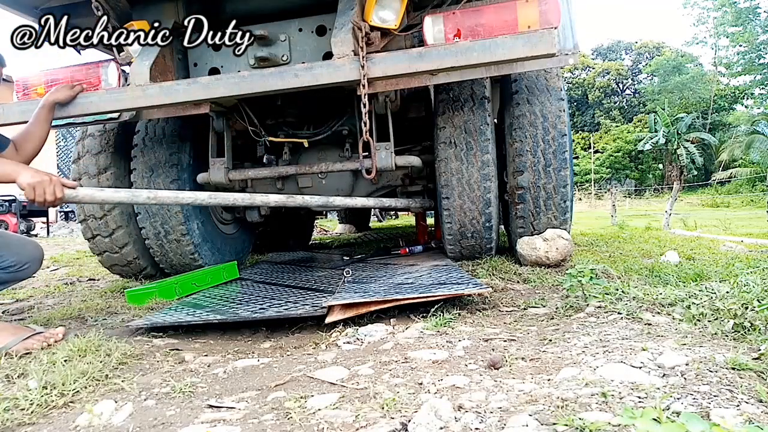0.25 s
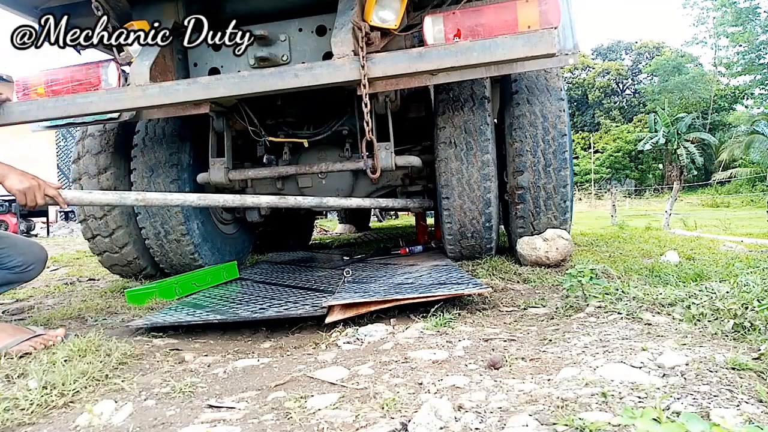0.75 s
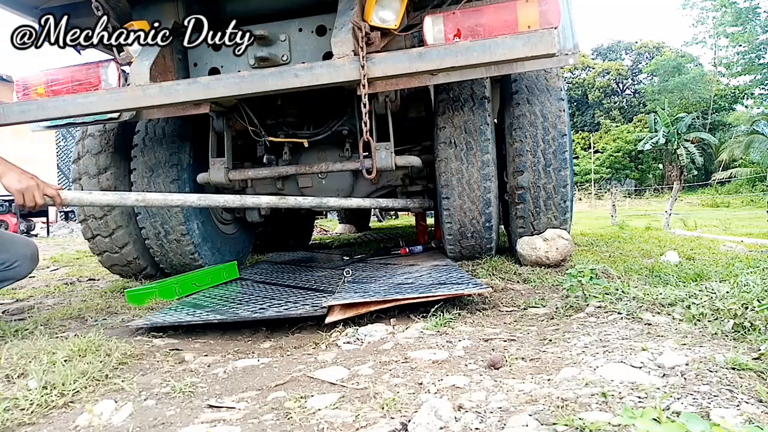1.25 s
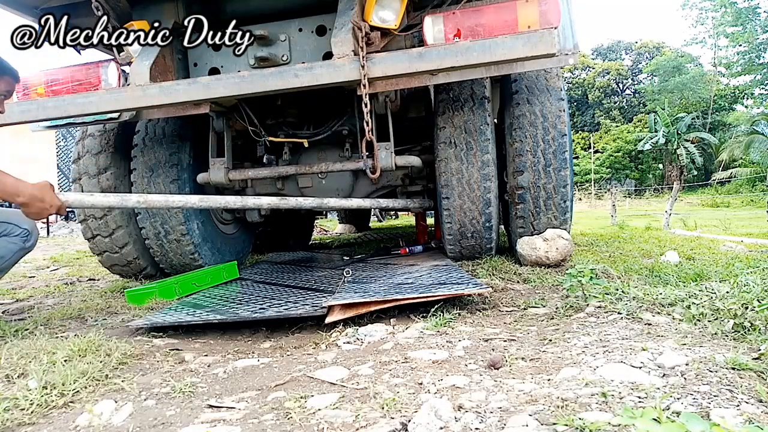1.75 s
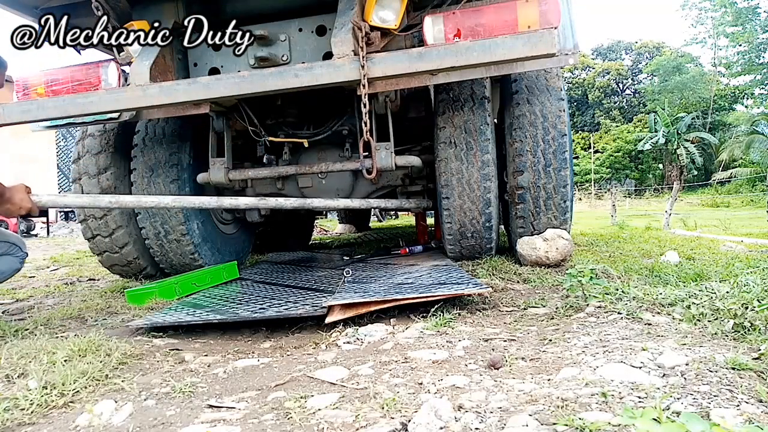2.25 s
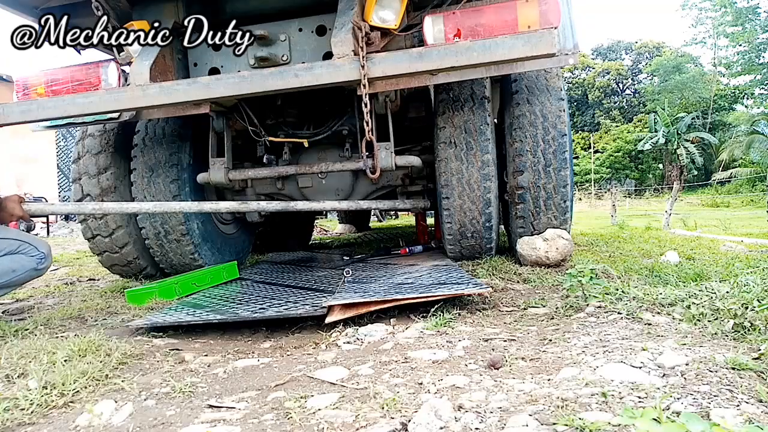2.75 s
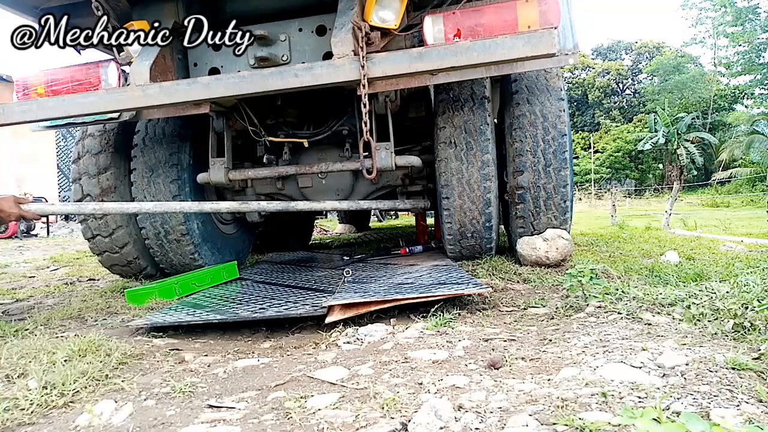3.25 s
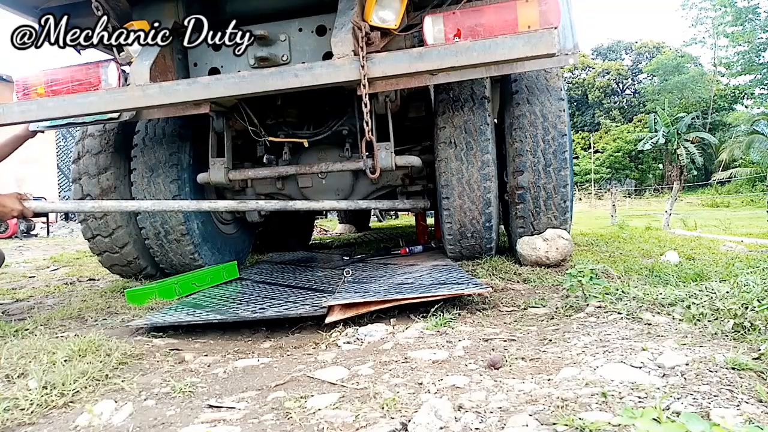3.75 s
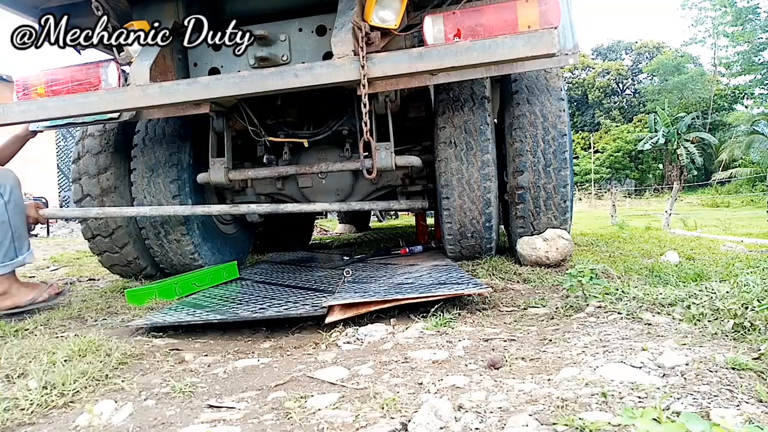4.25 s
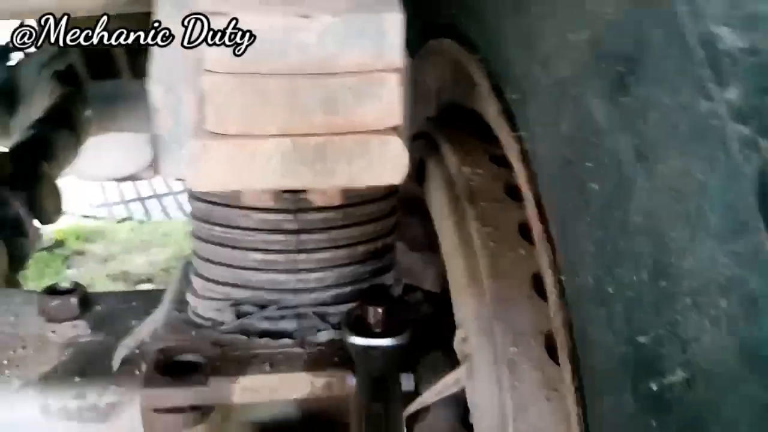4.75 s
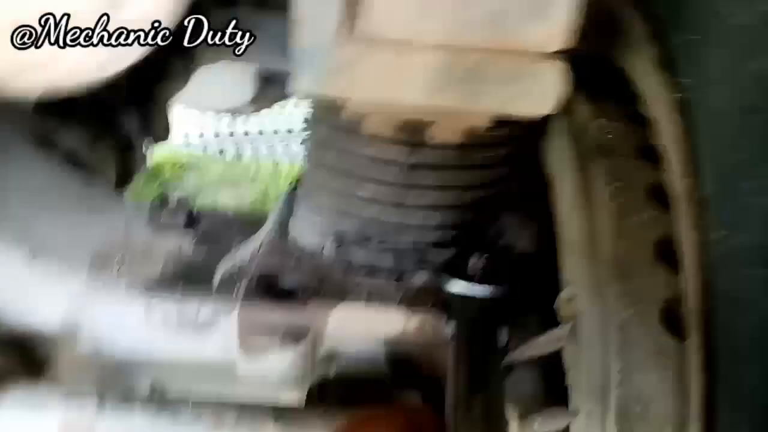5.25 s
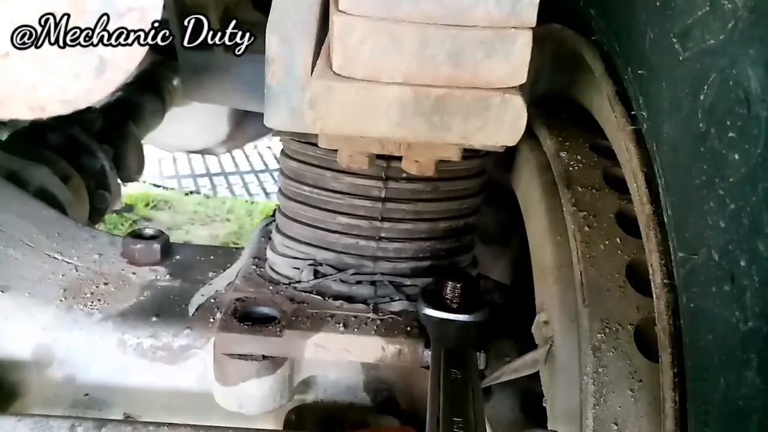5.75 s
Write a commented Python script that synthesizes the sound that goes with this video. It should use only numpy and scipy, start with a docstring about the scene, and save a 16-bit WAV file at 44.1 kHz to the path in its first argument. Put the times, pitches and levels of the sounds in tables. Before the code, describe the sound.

A dense insect chorus buzzes over a faint distant engine with a few small metal ticks, then low wind buffeting thumps the microphone.

```python
"""Beside a parked truck, then under it: a chorus of insects buzzes from dense clicks ringing resonances.
A cricket's raspy chirps and small metal ticks are shaped noise; an engine far away is a stack of wavering sines.
Behind them lie soft drones, a thin whine and a roar. Late on the scene cuts to under the truck, where noise
rumble and short sine puffs of wind buffet each microphone port on its own, with grainy scuffs. The left port is
muffled; what the ports share of chorus, engine, noisy drone bands, whine and roar reaches it first."""
import sys
import numpy as np
from scipy import signal
from scipy.fft import rfft, irfft, next_fast_len
from scipy.io import wavfile
from scipy.ndimage import uniform_filter1d, map_coordinates

SR = 44100
rng = np.random.default_rng(int(sys.argv[2]) if len(sys.argv) > 2 else 0)


def master(y):
    """Save y as 16-bit WAV."""
    cut = np.clip(np.atleast_2d(y).T, -1, 1)
    pcm = np.round(cut * 32767)  # scale
    wavfile.write(sys.argv[1], SR, pcm.astype(np.int16))


N = 264139

# Strength of the wind buffeting under the truck, before the left port's lift in scene().
# Each row: time in seconds, left level in dB, right level in dB.
BUFFETING = [(4.78, -42.5, -55), (4.95, -38, -45.5), (5.1, -40.5, -41), (5.26, -42.5, -35),
             (5.42, -37.5, -39), (5.57, -45, -37), (5.72, -35, -34.5), (5.88, -45.5, -34.5),
             (5.99, -43, -39)]
GUST_START_S = 4.775
PORT_LAG_S = 50 / SR  # how much later the right port hears most shared sounds


def amp(db):
    """Amplitude factor for a level in dB."""
    return 10 ** (np.asarray(db) / 20)


def unit(x):
    """Scale each channel to an RMS of one."""
    return x / np.sqrt(np.mean(x ** 2, axis=-1, keepdims=True) + 1e-20)


def along(points, hz):
    """Read a curve of (Hz, value) points on a log frequency axis."""
    point_hz, value = np.transpose(points)
    return np.interp(np.log(hz + 1), np.log(point_hz + 1), value)


def curves(rows):
    """One value per sample for each column after the time."""
    s, *columns = np.transpose(rows)
    return [np.interp(np.arange(N) / SR, s, column) for column in columns]


def wobble(rate):
    """A smooth random curve, rate knots a second."""
    knots = rng.standard_normal(int(N * rate / SR) + 4)
    return map_coordinates(knots, [np.arange(N) * rate / SR])


def filtered(x, response):
    """Shape the spectrum of x by a complex response of frequency."""
    m = next_fast_len(x.shape[-1] + 8192)
    spectrum = rfft(x, m) * response(np.fft.rfftfreq(m, 1 / SR))
    return irfft(spectrum, m)[..., :x.shape[-1]]


def resonance(hz, centre_hz, width_hz):
    """Response of one damped resonator; its powers are narrower bands."""
    return 1j * hz * width_hz / (centre_hz ** 2 - hz ** 2 + 1j * hz * width_hz)


def spread(three, alike, lag_s):
    """A shared signal, late at the right port, mixed with one of each port's own."""
    alike = np.clip(alike, 0, 1)
    late = filtered(three[0], lambda hz: np.exp(-2j * np.pi * hz * lag_s))
    shared = np.array([three[0], late])
    return np.sqrt(alike) * shared + np.sqrt(1 - alike) * three[1:]


def clicks(count, rate, jitter):
    """Three crowds of singers, each insect clicking at its own nearly steady rate."""
    rates = rate * amp(rng.normal(0, 1.5, (3, count, 1)))
    steps = (1 + jitter * rng.standard_normal((3, count, int(2 * rate * N / SR)))) / rates
    start_s = -rng.random((3, count, 1)) / rates
    at = ((np.cumsum(steps, axis=2) + start_s) * SR).astype(int).clip(0, N)
    size = rng.standard_normal(at.shape)
    # late clicks pile up at index N, which is cut off
    return np.array([np.bincount(a.ravel(), s.ravel(), N + 1)[:N] for a, s in zip(at, size)])


def chorus():
    """Dense clicks ring each resonance; under the truck direct sound is shaded and only scattered sound stays."""
    # Resonances of the singers. Each row: centre in Hz, width of one stage in Hz, base level in dB in the open,
    # base level in dB under the truck, left-right likeness in the open from 0 to 1.
    singers = [(3428, 655, -53, -52, 0.85), (3618, 406, -51.5, -54.5, 0.8), (4042, 640, -47, -48, 0.63),
               (4860, 3900, -61.5, -83, 0.14), (6686, 810, -62.5, -60, .3), (7260, 1570, -55, -57.5, 0.46),
               (8120, 690, -63, -83, 0.11), (8770, 2000, -64, -57, 0.15), (10640, 2760, -63.5, -63, 0.13),
               (14740, 1000, -62.5, -64, .1), (15300, 1000, -63.5, -62.5, .1)]
    # Seconds at which the crossfade from the open to under the truck starts and ends.
    crossfade_s = (4.83, 4.98)
    start_db, fade_db_per_s, shaded_db = 1.5, 0.27, -2.5  # added to the base levels
    dip_s, dip_attack_s, dip_db, dip_recover_s = 4.69, .02, -6, 0.085  # the level dips briefly
    t = np.arange(N) / SR
    under = np.interp(t, crossfade_s, [0, 1])
    crowd = clicks(count=150, rate=170, jitter=.1)
    out = np.zeros((2, N))
    for hz, width, open_db, under_db, alike in singers:
        stretch = np.roll(crowd, rng.integers(N), axis=1)
        ring = unit(filtered(stretch, lambda f: resonance(f, hz, width) ** 3))
        level_db = open_db + (under_db - open_db) * under + 0.63 * wobble(6.09)
        out += amp(level_db) * spread(ring, alike * (1 - 0.95 * under), lag_s=33 / SR)
    onset = np.clip((t - dip_s) / dip_attack_s, 0, 1)
    recovery = np.exp(-np.clip(t - dip_s - dip_attack_s, 0, 1) / dip_recover_s)
    return out * amp(start_db - fade_db_per_s * t + shaded_db * under + dip_db * onset * recovery)


def cricket():
    """Each chirp is a short swell of raspy wing strokes near 6.5 kHz, off to the left."""
    # Each row: centre in seconds, relative level in dB.
    chirps = [(.52, -64), (1.22, -62), (1.68, -64), (2.25, -65), (2.75, -65), (3.3, -65), (3.8, -65),
              (4.25, -65), (4.7, -69), (5.04, -65), (5.63, -67)]
    t = np.arange(N) / SR
    swell = sum(amp(db) * np.exp(-((t - s) / 0.055) ** 2) for s, db in chirps)
    strokes = 0.42 + np.abs(np.sin(np.pi * 65 * t))  # 65 strokes a second
    rasp = unit(filtered(rng.standard_normal(N), lambda f: resonance(f, 6520, 580) ** 2))
    return swell * strokes * rasp * amp([[8], [-1]])  # left, right dB


def small_puffs(count):
    """Small puffs at jittered moments, by turns left and right, following the buffeting."""
    length_ms, pitch_hz = 11.4, 132  # typical values, scattered below
    over_buffeting_db, overtone_db, edge_db = 7.5, -16.5, -31.5  # overtone and edge relative to the puff
    s, left_db, right_db = np.transpose(BUFFETING)
    when = rng.random(count)
    length, pitch, size = rng.standard_normal((count, 3)).T
    at = GUST_START_S + (np.arange(count) + when) / count * (N / SR - .03 - GUST_START_S)
    port = np.arange(count) % 2
    buffet_db = np.where(port, np.interp(at, s, right_db), np.interp(at, s, left_db))
    db = buffet_db + over_buffeting_db + 3 * size
    return np.transpose([at, port, length_ms * amp(3 * length), pitch_hz * amp(1.2 * pitch),
                         db, db + overtone_db, db + edge_db])


def wind():
    """Eddies push each port on its own: a lumpy rumble, and single puffs of a few cycles with a hissy edge."""
    # Spectrum of the rumble. Each row: frequency in Hz, relative level in dB per Hz.
    gust_spectrum = [(25, -30), (60, 1), (100, -2), (150, -3.5), (250, -6), (400, -20), (600, -45),
                     (1200, -41), (2500, -69)]
    # Strong puffs, before the left port's lift in scene(). Each row: centre in seconds, port (0 left, 1 right),
    # length scale in ms, pitch in Hz, level in dB, overtone in dB, hissy edge in dB before a 3 dB lift.
    strong_puffs = [(4.801, 0, 17, 174, -37, -38, -67), (4.849, 0, 7.8, 198, -35, -31, -51),
                    (4.859, 0, 11.5, 125, -27, -28.5, -44), (4.89, 0, 8.7, 134, -27, -24.5, -49),
                    (4.942, 0, 23, 121, -33, -40, -67), (4.979, 0, 23, 126, -32, -40, -55),
                    (5.073, 1, 24, 96, -31, -56, -62), (5.076, 0, 12, 146, -27.5, -45, -62),
                    (5.126, 0, 5.4, 149, -29, -31, -45), (5.171, 1, 16, 145, -23.5, -33, -51),
                    (5.184, 1, 12.3, 132, -26, -30.5, -43), (5.22, 1, 27, 163, -38, -37, -49.5),
                    (5.284, 1, 36, 100, -22.5, -35.5, -47.5), (5.314, 1, 11, 111, -26, -39, -48),
                    (5.331, 0, 7, 166, -29, -40, -52), (5.431, 0, 7.9, 148, -21, -26.5, -55),
                    (5.436, 1, 11.5, 134, -22, -34, -54), (5.455, 1, 7.4, 119, -22, -44, -48),
                    (5.459, 0, 9.9, 143, -23, -45, -62), (5.479, 0, 10, 124, -34, -50, -41),
                    (5.487, 1, 12, 116, -26, -21.5, -36.5), (5.556, 1, 7.8, 156, -26, -36, -55),
                    (5.627, 0, 6, 191, -16.5, -22, -59), (5.637, 0, 12, 124, -17.5, -22, -46),
                    (5.661, 1, 3.7, 144, -15, -21, -65), (5.663, 0, 10.6, 150, -24.5, -24, -44),
                    (5.684, 1, 33, 123, -30, -27.5, -51), (5.695, 0, 4.4, 130, -23, -18.5, -46),
                    (5.716, 0, 14, 173, -34, -32, -48), (5.759, 1, 9.5, 154, -16.5, -36, -55),
                    (5.778, 1, 16.6, 106, -18, -51, -67), (5.832, 1, 8.1, 136, -20, -28, -47.5),
                    (5.84, 0, 15, 139, -28, -32, -71), (5.853, 1, 5.2, 122, -23, -44, -72),
                    (5.89, 1, 13, 112, -22.5, -34.5, -69), (5.918, 1, 20, 130, -26, -34, -65),
                    (5.98, 1, 9, 139, -32, -31, -56)]
    overtone_hz, overtone_scatter_hz = 292, 25.2  # upper ring of every puff, scattered either way
    start = np.clip((np.arange(N) / SR - GUST_START_S) / 0.012, 0, 1)
    lumps = amp(3.5 * np.array([wobble(30), wobble(30)]))
    rumble = unit(filtered(lumps * rng.standard_normal((2, N)), lambda hz: amp(along(gust_spectrum, hz))))
    out = np.pad(start * amp(curves(BUFFETING)) * rumble, ((0, 0), (0, SR)))
    t = np.arange(-SR // 10, SR // 10) / SR
    puffs = np.vstack([small_puffs(count=40), strong_puffs])
    luck = rng.random((len(puffs), 3))
    noise = rng.standard_normal((len(puffs), len(t)))
    edge = unit(filtered(noise, lambda f: resonance(f, 453, 380) ** 3))
    for (s, port, ms, hz, db, upper_db, edge_db), (a, b, c), hiss in zip(puffs, luck, edge):
        width = ms / 1000 * np.where(t < 0, .55, .75)  # quick rise, slower release
        upper_hz = overtone_hz + overtone_scatter_hz * (2 * c - 1)
        low = amp(db) * np.sin(2 * np.pi * (hz * t + a))
        upper = amp(upper_db) * np.sin(2 * np.pi * (upper_hz * t + b)) + amp(edge_db + 3) * hiss
        puff = low * np.exp(-(t / width / 0.86) ** 2) + upper * np.exp(-(t / width / 0.72) ** 2)
        out[round(port), round(s * SR) - SR // 10:][:len(t)] += puff
    return out[:, :N]


def scuffs():
    """Rough mid-range scuffs under the truck: short swells of grainy noise in one band."""
    # Each row: centre in seconds, length scale in ms, band centre in Hz, level in dB.
    scuff_rows = [(5.04, 35, 790, -58.5), (5.185, 14, 1000, -57), (5.22, 9, 1050, -56),
                  (5.27, 7, 1000, -52), (5.3, 22, 1030, -57)]
    t, out = np.arange(N) / SR, np.zeros((2, N))
    for s, ms, hz, db in scuff_rows:
        grain = amp(3.4 * wobble(200)) * rng.standard_normal((2, N))
        band = unit(filtered(grain, lambda f: resonance(f, hz, 330) ** 2))
        out += amp(db) * np.exp(-((t - s) * 1000 / ms) ** 2) * band
    return out


def ticks():
    """Small metal parts tick: each a dying burst of noise in its own band."""
    # Each row: start in seconds, right peak level in dB, band centre in Hz, width of one stage in Hz,
    # time for the unfiltered burst to fall 60 dB in seconds, left minus right in dB.
    tick_rows = [(1.263, -44, 2500, 5000, 0.18, 2), (1.285, -39.5, 5000, 9000, .1, 5),
                 (2.053, -48, 1800, 2000, 0.11, -2), (4.108, -48, 1780, 700, 0.06, 1.5),
                 (5.476, -45, 1000, 900, 0.055, 0), (5.888, -42.5, 6500, 4000, 0.051, 6),
                 (5.974, -34.5, 5500, 4000, .05, 0)]
    out, t = np.zeros((2, N + SR)), np.arange(SR // 4) / SR
    for s, db, hz, width, t60, pan_db in tick_rows:
        burst = rng.standard_normal((2, len(t))) * amp(-60 * t / t60) * (1 - np.exp(-t / 0.00052))
        burst = filtered(burst, lambda f: resonance(f, hz, width) ** 2)
        burst /= np.abs(burst).max(axis=1, keepdims=True)
        first = round(s * SR)
        out[:, first:first + len(t)] += amp(db + np.array([[pan_db], [0]])) * burst
    return out[:, :N]


def engine():
    """Multiples of the firing rate waver in level and phase, most near the fourth and at the highest."""
    # Each row: time in seconds, firing rate in Hz, relative level in dB.
    running = [(0, 29.46, -55.5), (1, 29.8, -54), (1.8, 29.88, -54), (2.6, 29.34, -55.5), (2.95, 29.7, -56),
               (3.2, 30.96, -60), (3.75, 31.24, -58), (4.7, 31.15, -60), (4.8, 31.2, -73),
               (5.99, 31.55, -69)]
    # Each row: multiple of the firing rate, relative level in dB at the lower speed, the same at the higher speed.
    multiples = [(2.97, -7, -3.5), (3.97, 0, 0), (5.026, -3, -5.5), (5.946, -7, -11.5), (6.946, -5, 0),
                 (7.93, 2, -7.5), (8.97, -6, -9.5), (9.97, -7.5, -8.5), (11.17, -8.5, -21),
                 (11.96, -17, -7.5), (13.15, -23, -2.5), (13.93, -4, -15), (16.1, -6, -26),
                 (17.74, -16, -26), (19, -18, -23), (20.82, -18.5, -16), (23.94, -20, -16.5),
                 (24.98, -21, -16), (28.93, -28, -17.5), (30, -20, -27)]
    rate, db = curves(running)
    turn = 2 * np.pi * np.cumsum(rate) / SR
    fast = np.clip((rate - 29.5) / 1.5, 0, 1)  # 0 at the lower speed, 1 at the higher
    hum = np.zeros(N)
    for k, idle_db, faster_db in multiples:
        rough = .2 + .06 * k + 1.5 * np.exp(-((k - 4) / 1.6) ** 2)
        level_db = idle_db + (faster_db - idle_db) * fast + 1.5 * rough * wobble(7)
        hum += amp(level_db) * np.sin(k * turn + .45 * rough * wobble(6) + 7 * rng.random())
    return amp(db) * spread(np.array([hum, 0 * hum, 0 * hum]), 1, lag_s=PORT_LAG_S)


def drones():
    """Far off, one steady hum, at once at both ports, and fuzzy narrow noise bands that each swell slowly."""
    # Frequency in Hz and mean level in dB of the hum.
    hum_hz, hum_db = (61.5, -57)
    # Each row: centre in Hz, width of one stage in Hz, peak level in dB, loudest at in seconds,
    # time from there to fall to 1/e in seconds.
    swells = [(105, 17, -56, 0.009, 0.68), (103.9, 12, -53.5, 5.6, 1.8), (546, 59, -63.5, 2.6, 0.64),
              (550, 68, -71, 4.54, 1.1), (858, 180, -72.5, 3, 1.9)]
    t = np.arange(N) / SR
    hum = amp(hum_db + 1.5 * wobble(3)) * np.sin(2 * np.pi * hum_hz * t + .6 * wobble(3))
    out = np.array([hum, hum])
    for hz, width, db, s, fall_s in swells:
        band = unit(filtered(rng.standard_normal((3, N)), lambda f: resonance(f, hz, width) ** 2))
        out += amp(db) * np.exp(-((t - s) / fall_s) ** 2) * spread(band, .7, lag_s=PORT_LAG_S)
    return out


def whine():
    """A faint, far, wavering tone slides to its pitch and holds, clearer on the left."""
    # Each row: start in seconds, end in seconds, first pitch in Hz, settled pitch in Hz, relative level in dB.
    tones = [(1.8, 2.31, 1334, 1380, -75.5), (3.0, 4.73, 1440, 1490, -75)]
    edge_s, glide_s = .06, 0.13
    t, tone = np.arange(N) / SR, np.zeros(N)
    for start, end, first_hz, hz, db in tones:
        pitch = hz + (first_hz - hz) * np.exp(-np.clip(t - start, 0, None) / glide_s)
        on = np.clip(np.minimum(t - start, end - t) / edge_s + .5, 0, 1)
        phase = 2 * np.pi * np.cumsum(pitch) / SR + .4 * wobble(20)
        tone += on * amp(db + 2.5 * wobble(15)) * np.sin(phase)
    both = spread(np.array([tone, 0 * tone, 0 * tone]), 0.88, lag_s=PORT_LAG_S)
    return both * amp([[3], [-2]])  # left, right dB


def roar():
    """Far traffic and leaves: noise, most alike at both ports in the bass."""
    # Each row: frequency in Hz, relative level in dB per Hz.
    roar_spectrum = [(20, -36), (45, -7), (70, -14.5), (110, -1), (200, -8), (350, -12.5), (550, -16.5),
                     (850, -18.5), (1150, -23), (1600, -24), (2300, -23.5), (3000, -17.5), (6000, -19.5),
                     (13000, -51.5)]
    # Each row: time in seconds, level in dB.
    roar_level = [(0, -49), (1, -51.5), (2, -50), (4.7, -52.5), (5.99, -51)]
    # Each row: frequency in Hz, left-right likeness from 0 to 1 before the final blend.
    likeness = [(60, 0.76), (400, 0.62), (800, 0.4), (1500, 0.052), (2000, 0.032)]
    z = signal.stft(rng.standard_normal((3, N)), nperseg=512)[2]
    # smooth random level changes over frequency, then time
    field = uniform_filter1d(rng.standard_normal(z.shape[1:]), size=5, axis=0)
    field = uniform_filter1d(field, size=14, axis=1)
    noise = signal.istft(z * amp(2.02 * field / field.std()), nperseg=512)[1][:, :N]

    def response(hz):
        """Spectrum of the shared part and of each port's own."""
        share = np.clip(along(likeness, hz), 0, 1)
        return amp(along(roar_spectrum, hz)) * np.sqrt([share, 1 - share, 1 - share])

    parts = filtered(noise, response)
    return amp(curves(roar_level)[0]) * unit(spread(parts, 0.65, lag_s=PORT_LAG_S))


def scene():
    """Sum the sources at the two ports, the wind stronger on the left, then muffle the left port."""
    # Response of the muffled left port. Each row: frequency in Hz, gain in dB.
    left_port = [(50, -2.5), (300, -4.5), (1500, -2), (3600, -5.5), (5300, -2), (6300, -4.5), (7000, -11.5),
                 (7600, -23), (8200, -35), (9300, -28), (10800, -26), (12000, -33), (13000, -24),
                 (14800, -36)]
    buffeting = wind() * amp([[3], [0]])  # left, right dB
    near = chorus() + cricket() + buffeting + scuffs() + ticks()
    far = engine() + drones() + whine() + roar()
    left, right = near + far
    return np.array([filtered(left, lambda hz: amp(along(left_port, hz))), right])


def record(dry):
    """The phone cuts the deep bass with two 45 Hz stages and keeps nothing above its band limit."""
    top_hz = 15500
    return filtered(dry, lambda hz: (hz < top_hz) * (1j * hz / (45 + 1j * hz)) ** 2)


dry = scene()
out = record(dry)
master(out)
```